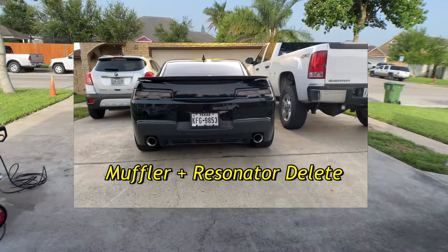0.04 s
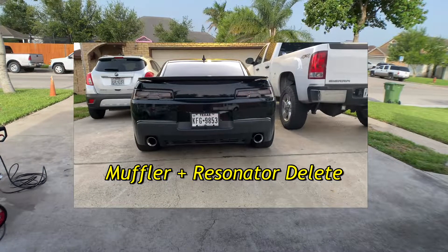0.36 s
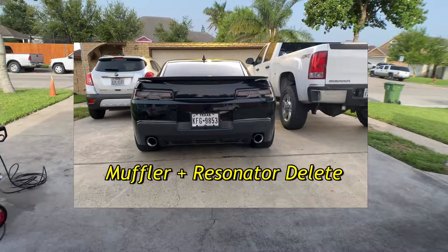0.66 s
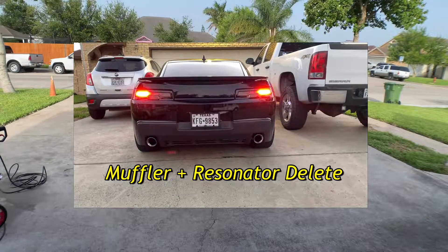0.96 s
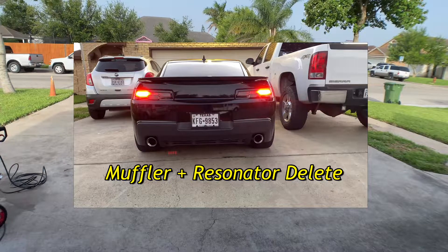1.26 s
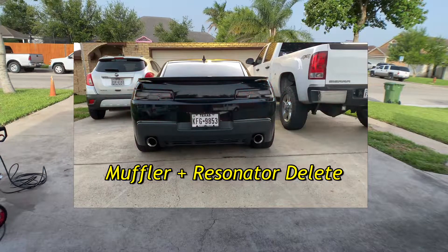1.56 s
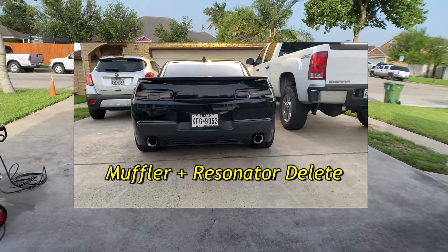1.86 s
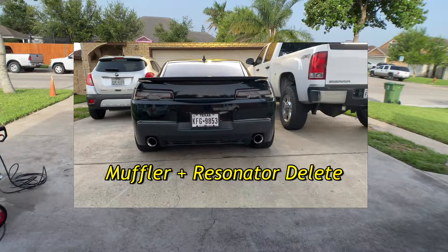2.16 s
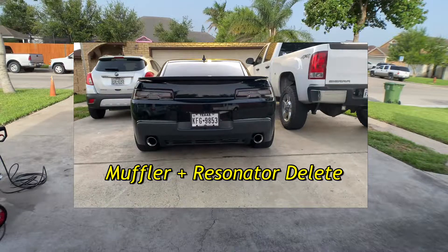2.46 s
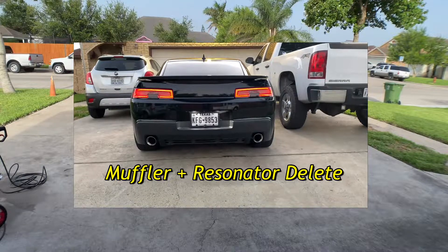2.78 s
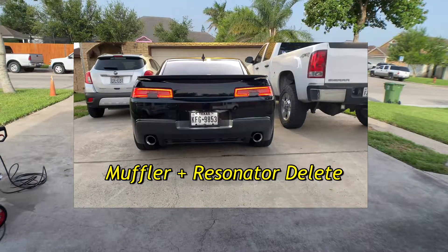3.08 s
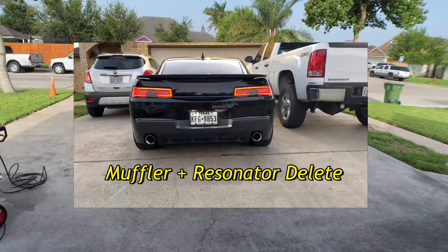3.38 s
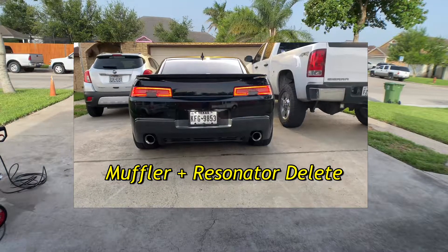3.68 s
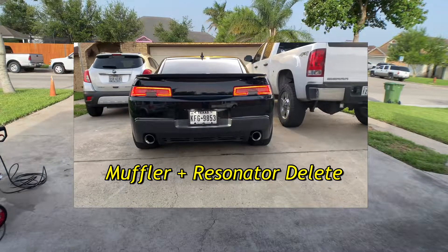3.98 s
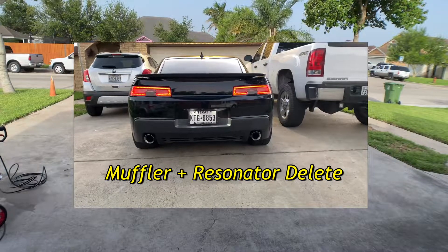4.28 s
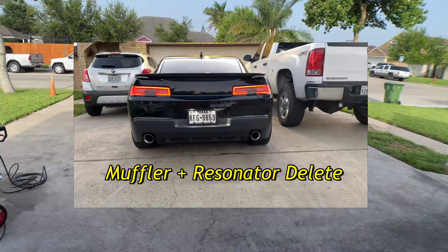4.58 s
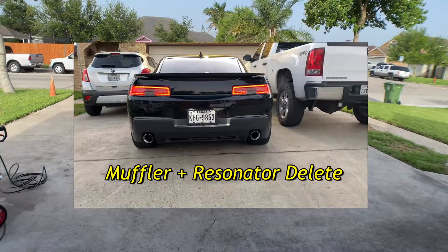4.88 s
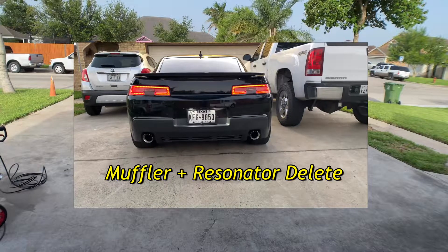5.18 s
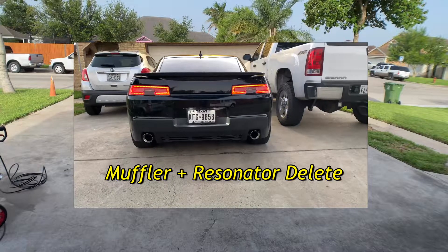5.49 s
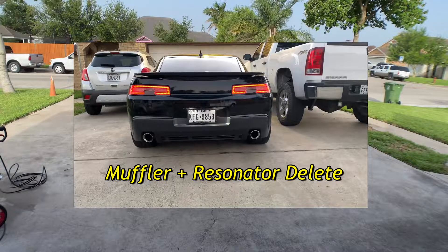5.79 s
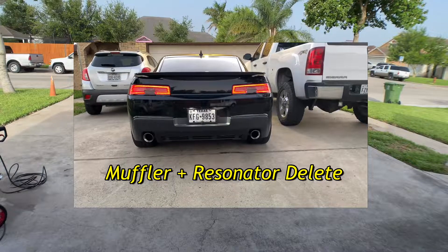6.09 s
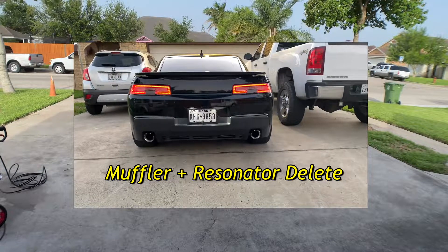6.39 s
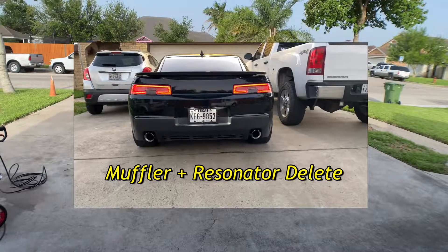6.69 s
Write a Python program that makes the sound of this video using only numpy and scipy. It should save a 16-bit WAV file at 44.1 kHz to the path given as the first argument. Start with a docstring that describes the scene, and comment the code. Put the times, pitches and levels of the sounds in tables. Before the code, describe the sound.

A V8 car engine cranks, fires with a loud rev and one backfire, then settles to a loping idle while a bird whistles nearby.

```python
"""A bird close to the microphone sings a quick sliding phrase over distant traffic and faint twittering.
On the driveway, heard from behind, a V8's starter clunks in and grinds for a second. The engine catches,
revs, backfires once and sinks to a loping idle: each firing thumps down the straight pipes, and its gas
rasps and ticks at the tips. Over the idle the bird gives two runs of arched whistles.
House fronts answer faintly."""
import sys
import numpy as np
from scipy import signal
from scipy.fft import rfft, irfft, next_fast_len
from scipy.io import wavfile
from scipy.ndimage import uniform_filter1d, map_coordinates

SR = 44100
rng = np.random.default_rng(int(sys.argv[2]) if len(sys.argv) > 2 else 0)


def put_to_file(sound):
    """Save the sound as 16-bit audio at rate SR, in the file named by the first command-line argument."""
    columns = np.atleast_2d(sound).T  # one column per channel
    safe = np.clip(columns, -1, 1)
    whole_steps = np.round(safe * 32767)
    wavfile.write(sys.argv[1], SR, whole_steps.astype(np.int16))


N = 301776
T = np.arange(N) / SR

# likeness of the left and right microphones: (f/Hz, correlation)
MIC_LIKENESS = [(200, 0.87), (1000, 0.27), (8000, 0.037)]
# the street's reverberation: (f/Hz, time to fall 60 dB/s)
STREET_DECAY = [(100, 0.97), (3500, 0.54), (10000, 0.0093)]
# spectrum of distant traffic: (f/Hz, level/dB)
TRAFFIC = [(20, -28), (55, -0.5), (125, -3.5), (270, -17), (500, -21), (900, -18), (1500, -32.5),
           (2800, -28), (6000, -44.5), (15000, -40.5)]
# the near bird's phrase: (t/s, length/s, start f/Hz, middle f/Hz, end f/Hz, level/dB)
SYLLABLES = [(0.046, 0.061, 5000, 5310, 5720, -32), (0.078, 0.089, 5700, 6360, 5060, -43),
             (0.133, 0.038, 4060, 4390, 4180, -34), (.173, 0.03, 2770, 2935, 2660, -31.5),
             (0.204, 0.041, 3710, 3277, 3350, -26.5), (0.231, 0.029, 3360, 2370, 2170, -29)]

# the starter labours against each compression: (t/s, length/s, level/dB)
COMPRESSIONS = [(1.496, 0.063, -31.5), (1.616, 0.074, -39), (1.712, 0.19, -36.5), (1.992, 0.12, -35),
                (2.209, .085, -34), (2.378, 0.14, -35.5)]
# rate at which the pinion's teeth mesh: (t/s, f/Hz)
TOOTH_RATE = [(1.51, 234.2), (1.72, 311.9), (1.87, 258.5), (2.47, 342.8)]
# spectra of the starter's gears and of the air chugging out: (f/Hz, level/dB)
GEARS = [(250, -36), (550, -14), (950, 1.5), (1250, -5.5), (1480, 3), (1800, -10.5), (2750, -8),
         (3100, -17), (4300, -10.5), (5600, -19.5), (7200, -17.5), (15500, -48)]
CHUG = [(25, -15.5), (60, -1.5), (150, -7), (380, -6.5), (900, -28.5)]
# pinion knocks: (t/s, ring level/dB, clatter level/dB)
KNOCKS = [(1.515, -34.5, -30), (2.224, -44, -37.5), (2.389, -40.5, -34)]
# modes of the starter housing: (f/Hz, level/dB, time to fall 60 dB/s)
HOUSING_MODES = [(1118, 15.5, 0.085), (2214, 3, 0.3)]

# the engine's firing rate: (t/s, f/Hz)
FIRING_RATE = [(2.5, 45.47), (2.66, 66), (2.8, 96.92), (3.04, 112.9), (3.17, 100), (3.3, 96.4),
               (3.42, 76.2), (3.56, 70.58), (3.7, 69.1), (3.9, 64.63), (4.4, 59.07), (4.8, 53.21),
               (5.15, 51.2), (5.55, 49.72), (5.9, 50.76), (6.3, 48.76), (6.8, 47.28)]
# unevenness of the burn: (t/s, amount 0-1)
UNEVEN_BURN = [(2.55, 0.5), (2.7, 0.09), (3.03, 0.13), (3.1, 0.73), (3.22, .15), (3.45, 1), (3.75, 0.2),
               (4.8, 0.12)]
# gas flow as the throttle opens for the start, shuts and finds idle: (t/s, level/dB)
GAS_FLOW = [(2.55, -16.5), (2.88, -17.5), (3.06, -23.5), (3.2, -33), (3.34, -29), (3.41, -44),
            (3.57, -36.5), (3.95, -39.5), (4.3, -34), (6.8, -35.5)]
# the cylinders at idle, in firing order:
# (pulse level/dB, runner delay/s, manifold echo delay/s, echo level/dB, rasp level/dB, tick level/dB)
CYLINDERS = [(0.8, .0002, 0.00854, -2, 3.5, -8), (-0.8, 0, 0.00841, 4, -0.5, -5.5),
             (1.3, .0006, 0.00921, -6.5, 3.5, -5.5), (0.9, -.0006, 0.0048, -9, -0.5, -8.5),
             (2.5, .0003, .0035, -6, -4, -5.5), (1.6, -.0002, 0.01251, -1, 1.5, -14),
             (0.8, .0002, 0.00751, -1.5, 3, -1.5), (1.15, -.0004, 0.0136, -9, -6.5, -11.5)]
# response of the straight pipe: (f/Hz, level/dB)
PIPE = [(20, -28.5), (38, -17.5), (49, -1), (65, 12), (100, 4.5), (122, 9), (150, 4), (200, 0.5),
        (228, -16.5), (266, -2), (305, -12), (360, -11.5), (435, -27), (475, -21.5), (570, -37.5),
        (900, -80)]
# spectra of the gas at the tips, a mid rasp, a bright tick and a broad rush: (f/Hz, level/dB)
RASP = [(350, -26.5), (570, -7), (690, 4.5), (780, 8.5), (870, 1.5), (1060, 6), (1300, -19), (2200, -53.5)]
TICK = [(900, -24.5), (1700, -9.5), (2200, -4.5), (2450, -9), (2750, 2), (3300, -13), (3780, -2.5),
        (4250, -24), (15000, -50)]
RUSH = [(700, -26), (1300, 1), (3800, -9.5), (4600, -10.5), (11000, -17.5), (15500, -25)]
# high hiss, strongest while the throttle is open: (t/s, level/dB)
HISS_LEVEL = [(2.53, -38), (2.64, -32.5), (2.78, -43.5), (3.0, -46), (3.12, -49.5), (3.35, -44),
              (3.41, -58.5)]
# pops at the tips: hard firings as the engine catches, the backfire's crack, and burbles at idle:
# (t/s, peak level/dB, f/Hz)
TIP_POPS = [(2.543, -9.5, 970), (2.568, -7, 950), (2.587, -9.5, 800), (2.605, -6.5, 950), (2.639, -5, 985),
            (3.356, -10.5, 760), (4.593, -23.5, 760), (5.198, -22.5, 750), (5.433, -22, 870),
            (5.754, -24, 760), (5.909, -22.5, 940), (6.09, -27, 1110), (6.475, -24, 740)]
# fuel fires in the pipe when the throttle shuts: (t/s, thump level/dB, crack level/dB)
BACKFIRE_BANGS = [(3.342, 4, -16), (3.354, 2.5, -11.5)]

# the near bird's whistles: (t/s, top f/Hz, level ahead of the throat/dB)
WHISTLES = [(4.152, 4480, -31.5), (4.429, 4336, -29), (4.713, 4326, -28), (5.004, 4337, -28),
            (6.188, 4248, -28), (6.481, 4308, -26), (6.764, 4290, -26)]
# the throat's resonances shape a whistle's fundamental and its octave: (f/Hz, gain/dB)
THROAT = [(2200, -26.5), (3100, -9.5), (3950, -15.5), (4300, -1), (5100, -15.5), (6200, -24), (8600, -42)]
OCTAVE = [(4400, -19), (5100, -7.5), (5700, -26), (7000, -31), (8600, -48.5)]

BOOM_KNEE_DB, BARK_KNEE_DB = -27.5, -33.5  # flows at which the pipe's boom and bark level off


def amp(db):
    """Decibels to gain."""
    return 10 ** (np.asarray(db) / 20)


def pan(db):
    """Gains that put the left microphone db above the right."""
    return amp([[db / 2], [-db / 2]])


def choked(db):
    """Gain that follows a level below 0 dB and flattens at 1 above it."""
    return 1 / np.sqrt(1 + amp(-db) ** 2)


def unit(x):
    """Scaled to rms 1."""
    return x / np.sqrt(np.mean(x ** 2) + 1e-20)


def steady(x, size=7000):
    """Scaled to a running rms of 1."""
    power = np.abs(uniform_filter1d(uniform_filter1d(x ** 2, size), size // 2))
    return x / np.sqrt(power + 1e-3 * power.mean())


def along(points, hz):
    """Reads (f/Hz, value) points on a log axis."""
    f, v = np.transpose(points)
    return np.interp(np.log(hz + 1), np.log(f + 1), v)


def curve(points):
    """(t/s, value) points as one value per sample."""
    return np.interp(T, *np.transpose(points))


def between(start, end, fade):
    """1 from start to end, with short ramps."""
    return np.clip((T - start) / fade, 0, 1) * np.clip((end - T) / fade, 0, 1)


def wobble(rate):
    """A smooth random curve, rate knots a second."""
    return map_coordinates(rng.standard_normal(int(N * rate / SR) + 4), [T * rate])


def phase(hz):
    """Running phase of a changing frequency, in radians."""
    return 2 * np.pi * np.cumsum(hz) / SR


def filtered(x, response):
    """x times a response of frequency."""
    m = next_fast_len(N + SR // 2)
    return irfft(rfft(x, m) * response(np.fft.rfftfreq(m, 1 / SR)), m)[..., :N]


def above(x, edge_hz, order=8):
    """The part of x over an edge."""
    return filtered(x, lambda hz: 1 - 1 / (1 + (hz / edge_hz) ** order))


def ring(x, spectrum, size=16384):
    """x through a causal (minimum-phase) body with this spectrum."""
    cepstrum = irfft(np.log(amp(along(spectrum, np.fft.rfftfreq(size, 1 / SR)))))
    cepstrum[1:size // 2] *= 2
    cepstrum[size // 2 + 1:] = 0
    return signal.fftconvolve(x, irfft(np.exp(rfft(cepstrum))))[:N]


def spread(a, b):
    """Two unrelated signals across the microphone pair: alike in the bass, apart in the treble."""
    turn = lambda hz: np.arccos(np.clip(along(MIC_LIKENESS, hz), -1, 1)) / 2
    mid = filtered(a, lambda hz: np.cos(turn(hz)))
    side = filtered(b, lambda hz: np.sin(turn(hz)))
    return np.array([mid + side, mid - side])


def noise(spectrum):
    """Coloured stereo noise of rms 1."""
    return unit(spread(*filtered(rng.standard_normal((2, N)), lambda hz: amp(along(spectrum, hz)))))


def pulses(times, sizes):
    """Impulses at the given moments."""
    return np.bincount(np.clip(np.asarray(times) * SR, 0, N).astype(int), sizes, N + 1)[:N]


def puffs(times, sizes, peak_s):
    """An envelope that peaks peak_s after each moment and dies away."""
    u = T[:SR // 4] / peak_s
    return signal.fftconvolve(pulses(times, sizes), u * np.exp(1 - u))[:N]


def street(x):
    """The diffuse answer of house fronts and parked cars."""
    hz, t, spectra = signal.stft(rng.standard_normal((2, SR // 2)), SR, nperseg=256)
    decay = amp(-60 * t / along(STREET_DECAY, hz)[:, None])
    tail = signal.istft(spectra * decay, SR, nperseg=256)[1]
    return signal.fftconvolve(x, tail / np.linalg.norm(tail[0]), axes=1)[:, :N]


def far_traffic(level_db=-50):
    """The low, slightly wavering murmur of distant roads."""
    return amp(level_db + wobble(12)) * noise(TRAFFIC)


def far_birds(level_db=-71, centre_hz=3400, range_octaves=0.25):
    """Faint twittering from distant trees, reaching the microphone only as echo."""
    hz = centre_hz * 2 ** (range_octaves * wobble(22))
    chirps = np.sin(phase(hz)) * np.maximum(wobble(24), 0)
    return amp(level_db) * unit(street(chirps * pan(0)))


def bird_song(edge_db=-14.5, flutter_db=4):
    """Close by on the left: quick sliding syllables with a slight buzz, each loudest in its middle."""
    phrase = np.zeros(N)
    buzz = 1 + 0.022 * wobble(401.7)
    for s, length, start_hz, middle_hz, end_hz, db in SYLLABLES:
        place = 2 * (T - s) / length - 1
        hz = np.interp(place, [-1, 0, 1], [start_hz, middle_hz, end_hz])
        level = amp(db + edge_db * np.minimum(np.abs(place), 1)) * between(s, s + length, 0.00099)
        phrase += level * np.sin(phase(hz * buzz))
    return phrase * amp(flutter_db * wobble(217.3)) * pan(4.2)


def starter(start_s=1.508, end_s=2.56, free_db=-39.5, rise_s=0.027, release_s=0.047, whine_hz=8020):
    """The pinion grinds and the motor whines, louder under load; air chugs after each compression."""
    labour = np.zeros(N)
    for s, length, db in COMPRESSIONS:
        release = np.exp(-np.maximum(T - s - length, 0) / release_s)
        labour += amp(db) * np.clip((T - s) / rise_s, 0, 1) * release
    load = np.hypot(amp(free_db), labour)
    teeth = phase(curve(TOOTH_RATE) * (1 + 0.01714 * wobble(45)))
    grind = unit(noise(GEARS) * amp(0.99 * wobble(90)))
    partials = sum(amp(5.8 * wobble(25.04)) * np.sin(k * teeth + 1.34 * wobble(70)) for k in range(3, 16))
    mesh = unit(ring(partials, GEARS))
    motor = sum(np.sin(k * teeth + 0.98 * wobble(300)) for k in (9, 15))
    whine = np.sin(phase(whine_hz + 30 * wobble(240)))
    gears = load * unit(grind + amp(-1.5) * mesh + amp(-13) * motor + amp(-20) * whine)
    chug = amp(-10) * np.interp(T - 0.039, T, load) * noise(CHUG)  # 39 ms behind the load
    return (gears * pan(3.1) + chug) * between(start_s, end_s, 0.0037)


def pinion_knocks(attack_s=0.0037):
    """The pinion slams in and jolts; its housing rings and clatters."""
    s, ring_db, clatter_db = np.transpose(KNOCKS)
    t = T[:SR // 2]
    housing = sum(amp(db - 60 * t / t60) * np.sin(2 * np.pi * hz * t) for hz, db, t60 in HOUSING_MODES)
    housing *= 1 - np.exp(-t / attack_s)
    clatter = puffs(s, amp(clatter_db), peak_s=0.012) * noise(RUSH)
    return signal.fftconvolve(pulses(s, amp(ring_db)), housing)[:N] + clatter


def block_clunk(at_s=1.554, level_db=-29, hz=264):
    """The block rocks on its mounts as it takes up the load."""
    return puffs([at_s], amp([level_db]), peak_s=0.0064) * np.sin(2 * np.pi * hz * T + wobble(250))


def pipe_thumps(train, gas, firing_hz, flow_db, idle_hz, split_hz=137, drone_hz=63.7, lope_db=3.5):
    """Pulses and gas ring the pipe: a low boom and a bark above it, each growing with flow to a knee."""
    pipe = ring(amp(-24 + 26 * curve(UNEVEN_BURN)) * unit(gas) + unit(train), PIPE)
    upper = above(pipe, split_hz, order=12)
    # the upper bark swells once per round of the eight cylinders
    rounds = np.cumsum(firing_hz) / SR / len(CYLINDERS)
    swell_db = lope_db * (idle_hz / firing_hz) ** 2 * np.cos(2 * np.pi * (rounds - 0.38))
    brighten_db = 0.43 * (flow_db - BARK_KNEE_DB)  # stronger pulses are steeper
    steepened = upper + (amp(swell_db + brighten_db) - 1) * above(upper, edge_hz=235)
    # the pipe drones when the firing rate meets its resonance
    drone = np.exp(-((firing_hz - drone_hz) / 6.3) ** 2)
    boom = amp(-9.5) * choked(flow_db + 6.5 * drone - BOOM_KNEE_DB) * steady(pipe - upper)
    bark = amp(-14 + 0.5 * drone) * choked(flow_db - BARK_KNEE_DB) * steady(steepened)
    return boom + bark


def tip_rasp(at, size, echo_s, lope, flow_db, leak_db=-20):
    """The outflow peaks between two thumps: part turbulence, part a slap that hardens with the flow."""
    gusts = puffs(at, size, peak_s=0.0065) + amp(leak_db)
    mid, side = [unit(gusts * rng.standard_normal(N)) for _ in range(2)]
    slap = unit(pulses(at, size) + pulses(at + echo_s / 2, size * lope))
    mid += slap * amp(0.36 * (flow_db - BARK_KNEE_DB))
    level = amp(flow_db + 2 + wobble(14))
    return level * spread(steady(ring(mid, RASP)), 0.4 * steady(ring(side, RASP)))


def tip_ticks(at, size, flow_db, leak=0.18):
    """The gas of each firing ticks at the tips in a short, bright spurt."""
    spurts = puffs(at, size, peak_s=0.0019) + leak
    mid, side = [steady(ring(spurts * rng.standard_normal(N), TICK)) for _ in range(2)]
    return amp(flow_db - 17.5) * spread(mid, side)


def exhaust(catch_s=2.514, tips_start_s=2.535, idle_hz=50):
    """Eight cylinders fire in turn down the pipes; the gas behind each thump rasps, ticks and hisses."""
    firing_hz, flow_db = curve(FIRING_RATE), curve(GAS_FLOW)
    at = T[1:][np.diff(np.floor(np.cumsum(firing_hz) / SR)) > 0]
    uneven = np.interp(at, T, curve(UNEVEN_BURN))
    period = 1 / np.interp(at, T, firing_hz)
    cylinder = np.arange(len(at)) % len(CYLINDERS)
    pulse_db, runner_s, echo_s, echo_db, rasp_db, tick_db = np.array(CYLINDERS)[cylinder].T
    lope = idle_hz * period  # the cylinders differ most at idle
    time_luck, pulse_luck, rasp_luck, tick_luck = rng.standard_normal((4, len(at)))
    at = at + lope * runner_s + 0.0016 * uneven * time_luck
    size = amp(lope * pulse_db + 5 * uneven * pulse_luck)
    # each cylinder's own path through the manifold gives the burble between the firing harmonics
    echoes = above(pulses(at + echo_s, size * amp(echo_db)), edge_hz=170, order=4)
    gas = puffs(at, size, peak_s=0.0039) * rng.standard_normal(N)
    thumps = pipe_thumps(pulses(at, size) + echoes, gas, firing_hz, flow_db, idle_hz)
    rasp = tip_rasp(at + 0.42 * period, amp(lope * (rasp_db + 3.5 * rasp_luck)), echo_s, lope, flow_db)
    ticks = tip_ticks(at + 0.55 * period, amp(tick_db + 3.6 * tick_luck), flow_db)
    hiss = amp(curve(HISS_LEVEL)) * noise(RUSH)
    tips = (rasp + ticks) * pan(3.5) + hiss
    return thumps * between(catch_s, np.inf, 0.034) + tips * between(tips_start_s, np.inf, 0.024)


def tip_pops(peak_s=0.003):
    """Rounded pops ring the tips: hard firings at the catch, the backfire's crack, burbles at idle."""
    return sum(puffs([s], amp([db]), peak_s) * np.sin(2 * np.pi * hz * T + wobble(250))
               for s, db, hz in TIP_POPS)


def backfire():
    """Fuel fires in the pipe: two bangs, close enough to be heard as one, ring its whole length."""
    s, thump_db, crack_db = np.transpose(BACKFIRE_BANGS)
    thump = ring(pulses([0], [1.0]), PIPE)
    thumps = signal.fftconvolve(pulses(s, amp(thump_db)), thump / np.abs(thump).max())[:N]
    cracks = puffs(s, amp(crack_db), peak_s=0.0024) * (noise(RASP) + amp(-34) * noise(RUSH))
    return above(thumps, edge_hz=200, order=3) + cracks


def bird_whistles(length_s=0.2416, scoop_end_s=0.042, fall_start_s=0.138, bend_s=0.0098):
    """Close by on the left: each whistle scoops up, arches and falls; its octave flashes near the end."""
    calls = np.zeros(N)
    waver = 1 + 0.0014 * wobble(80)
    flutter = amp(0.42 * wobble(45))
    hoarse = 0.2 * wobble(900)
    t = T[T < length_s]
    bend = lambda u: bend_s * np.logaddexp(0, u / bend_s)  # a ramp with a rounded corner
    scoop, fall = 6.8 * bend(scoop_end_s - t), 6 * bend(t - fall_start_s)  # shares of the top pitch
    envelope = np.clip(t / 0.047, 0, 1) * np.clip((length_s - t) / 0.016, 0, 1)
    for s, top_hz, db in WHISTLES:
        i = round(s * SR)
        n = min(len(t), N - i)
        hz = top_hz * np.abs(1 - scoop - fall)[:n]
        angle = phase(hz * (waver[i:i + n] + fall[:n] * hoarse[i:i + n]))  # roughens as it falls
        voice = amp(along(THROAT, hz)) * np.sin(angle) + amp(along(OCTAVE, 2 * hz)) * np.sin(2 * angle)
        calls[i:i + n] += amp(db) * envelope[:n] * voice
    return calls * flutter * pan(7)


def scene(mic_lag_s=0.000093, echo_db=-15):
    """A microphone pair on the driveway behind the car, the bird close by, traffic far off."""
    bird = bird_song() + bird_whistles()
    car = starter() + pinion_knocks() + block_clunk() + exhaust() + tip_pops() + backfire()
    # the car's sound reaches the left microphone a little sooner
    car = filtered(car, lambda hz: np.exp(1j * np.pi * hz * mic_lag_s * np.array([[1], [-1]])))
    house_fronts = amp(echo_db) * (street(bird) + street(above(car, edge_hz=260)))
    return far_traffic() + far_birds() + bird + car + house_fronts


def record(dry, ceiling=0.88, order=8, top_hz=15800):
    """The loudest peaks are rounded off, and nothing is kept above the recorder's band limit."""
    rounded = dry / (1 + np.abs(dry / ceiling) ** order) ** (1 / order)
    return filtered(rounded, lambda hz: hz < top_hz)


dry = scene()
out = record(dry)
put_to_file(out)
```